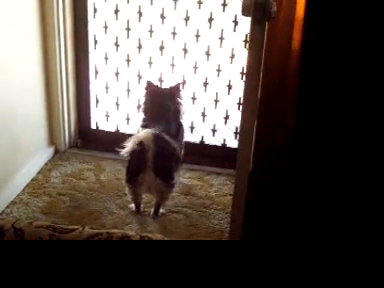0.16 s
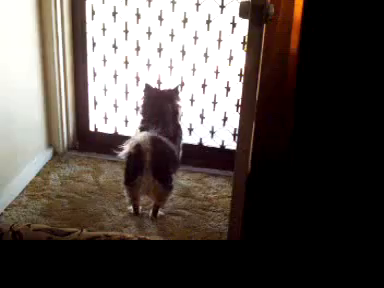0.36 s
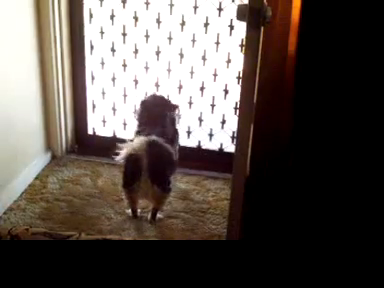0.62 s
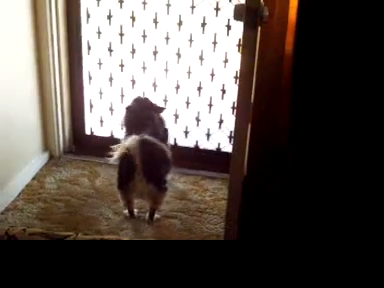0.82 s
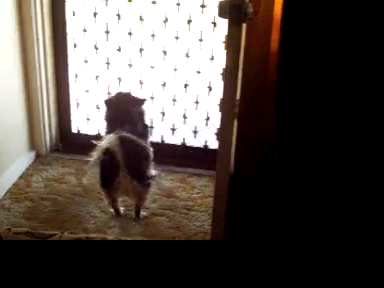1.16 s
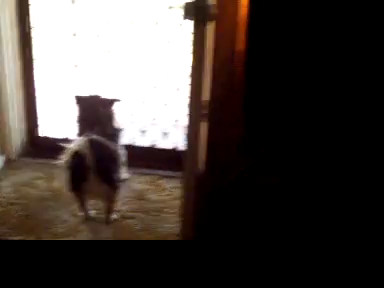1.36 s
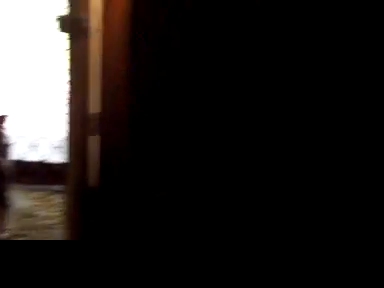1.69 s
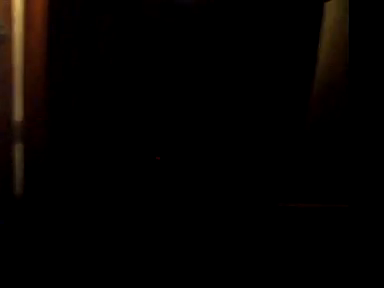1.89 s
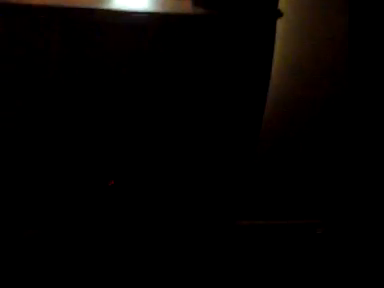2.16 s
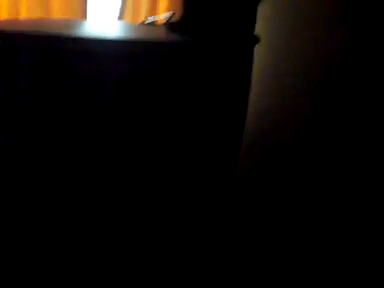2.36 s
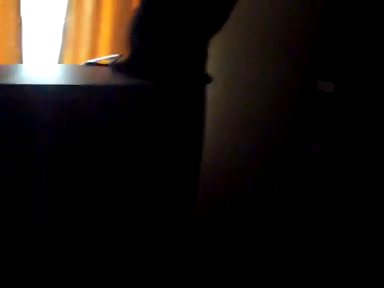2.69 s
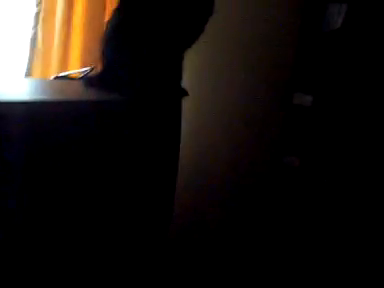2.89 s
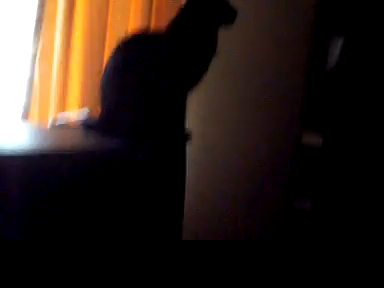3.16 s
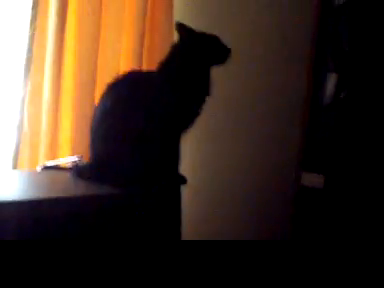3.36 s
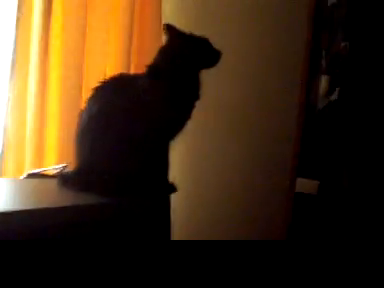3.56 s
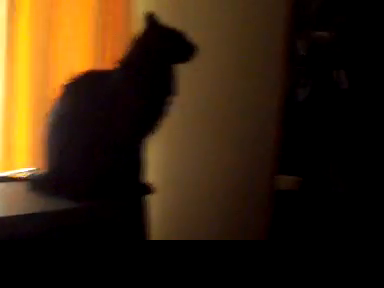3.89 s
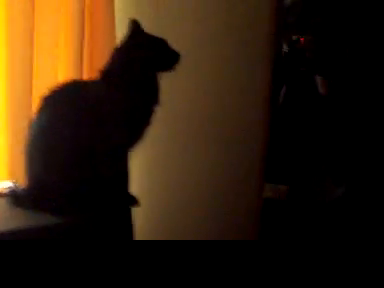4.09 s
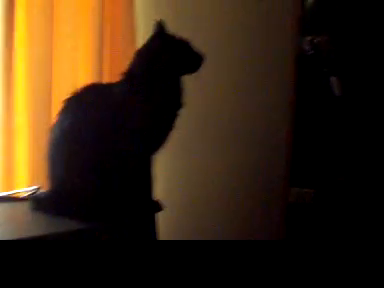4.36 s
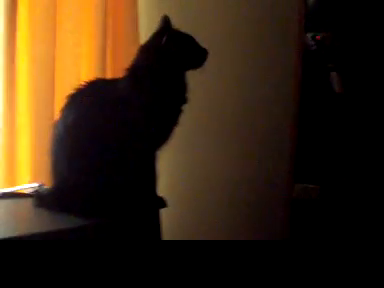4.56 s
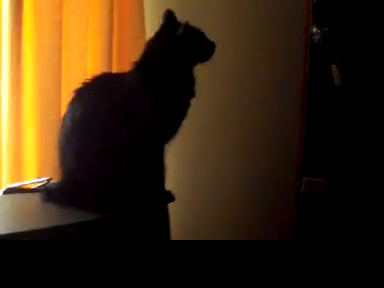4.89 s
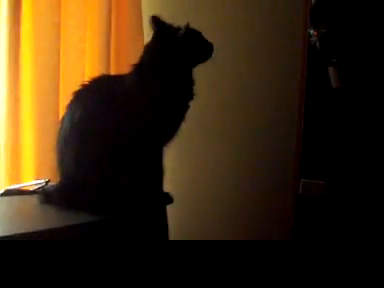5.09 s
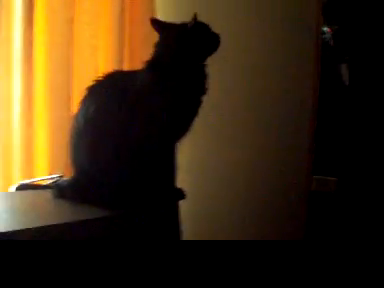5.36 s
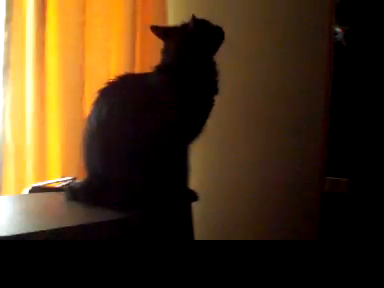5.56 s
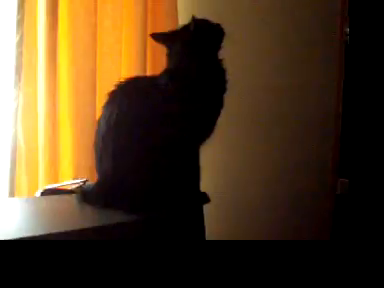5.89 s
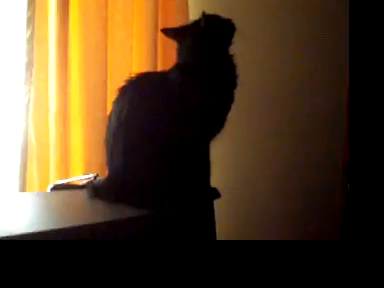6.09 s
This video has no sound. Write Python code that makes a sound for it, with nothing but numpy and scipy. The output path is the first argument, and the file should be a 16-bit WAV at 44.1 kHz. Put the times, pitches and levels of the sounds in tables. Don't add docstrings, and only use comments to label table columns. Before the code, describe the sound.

Hoarse little-dog barks come in an uneven run of seven, then one alone, then two more clusters, ringing in a home hallway.

```python
import sys
import numpy as np
from scipy import signal
from scipy.fft import rfft, irfft
from scipy.io import wavfile
from scipy.ndimage import uniform_filter1d

SR = 44100
rng = np.random.default_rng(int(sys.argv[2]) if len(sys.argv) > 2 else 0)


def decibels_to_gain(level_db):
    exponent = np.asarray(level_db, float) / 20
    return 10 ** exponent


def digitize_waveform(pressure):
    field = np.atleast_2d(pressure).T
    bounded = np.clip(field, -1, 1)
    quanta = np.round(bounded * 32767).astype(np.int16)
    wavfile.write(sys.argv[1], SR, quanta)


N = 274743
LEAD_IN_S = .04


def at_hz(points, hz):
    points_hz, values = np.array(points).T
    return np.interp(np.log(hz + 1), np.log(points_hz), values)


def rms_one(x):
    return x / np.sqrt(np.mean(np.abs(x) ** 2) + 1e-20)


def wander(rate_hz, size):
    r = np.exp(-2 * np.pi * rate_hz / SR)
    noise = rng.standard_normal(size + 4000)
    return rms_one(signal.lfilter([1], [1, -2 * r, r * r], noise)[4000:])


def dog():
    # start in seconds, opening level in dB, swell in seconds,
    # hold in seconds, peak level in dB.
    bark_events = [(0.411, -22, .064, 0.015, -3.5), (0.614, -26, 0.047, 0.028, -10),
                   (0.821, -28, 0.05, 0.017, -16), (1.054, -31, 0.025, 0.021, -21.5),
                   (1.26, -38.5, 0.046, 0.038, -19.5), (1.489, -30.5, 0.036, 0.042, -12),
                   (1.706, -29, .022, 0.075, -16.5), (2.665, -17, 0.038, 0.047, -9),
                   (3.834, -30.5, .046, .048, -6.5), (4.046, -33, 0.027, 0.071, -18),
                   (4.29, -35.5, .05, .025, -27), (4.817, -40.5, 0.058, 0.053, -12.5),
                   (5.122, -48, 0.048, 0.072, -22.5), (5.365, -24.5, 0.0483, 0.019, -12.5),
                   (5.621, -36.5, 0.043, 0.071, -17.5)]
    # top pitch in Hz, share of it at the opening, share at the end,
    # brightness in dB, drop after the hold in dB.
    bark_arches = [(412.5, 0.65, .8, 1.5, 18.5), (407.5, 1, 0.43, 1.5, 12), (354, .78, .66, 2.5, 9.5),
                   (294, 0.58, 0.6, -1.5, 10), (281, 0.64, 1, -4.5, 13), (250.6, 1, 0.89, 1, 11.5),
                   (337.4, .76, 0.78, -0.5, 13.5), (415.8, 0.69, 1, 1.5, 15), (415.3, 0.77, 0.92, 5, 13),
                   (353, 0.75, .8, 6, 11), (267, 0.81, 0.27, -2.5, 11), (391.8, .82, 0.95, 0.5, 11.5),
                   (269, .86, 0.82, -5, 11.5), (399.5, 0.83, 0.98, 3, 4), (379.2, .76, 0.5, 2.5, 13)]
    roughness = [.45, .65, .2, .1, .5, .8, .5, .75, .33, .2, .25, .28, .1, .5, .72]
    openings = [0.87, 0.89, 0.89, 0.89, 0.89, 0.91, 0.93, 0.91, 0.9, 0.95, 0.86, 0.89, 0.87, 0.93, 0.98]
    tongues_hz = [2260, 2100, 1870, 1770, 1800, 2070, 2170, 2390, 2260, 2056, 1620, 2162, 1960, 2322, 2170]
    out = growl()
    for event, arch, *manner in zip(bark_events, bark_arches, roughness, openings, tongues_hz):
        call = bark(effort(*event, *arch), *manner)
        at = round((event[0] - LEAD_IN_S) * SR)
        out[at:at + len(call)] += call
    return out


def effort(s, opening_db, swell, hold, peak_db, pitch_hz, opening, closing, bright_db, drop_db):
    drop_s, trail_s, trail_db = .03, .065, 14.5
    times = s + np.cumsum([0, swell / 2, swell / 2, hold / 2, hold / 2, drop_s, trail_s])
    halfway_db = opening_db + 0.44 * (peak_db - opening_db)
    from_peak_db = peak_db - np.cumsum([0, 0, 0, drop_db, trail_db])
    level_db = np.array([opening_db, halfway_db, *from_peak_db])

    swell_pitch, held_pitch = 0.95, 1
    risen = opening + .72 * (swell_pitch - opening)
    sagged = held_pitch + 0.51 * (closing - held_pitch)
    pitch = pitch_hz * np.array([opening, risen, swell_pitch, 1, held_pitch, sagged, closing])

    chest_db = -38 - (1 - 0.18) * level_db
    chest_db = chest_db + 0.5 * (times == times[-1])
    bright_db = bright_db + 0.36 * (level_db - peak_db)
    return np.transpose([times, level_db, pitch, chest_db, bright_db])


def bark(rows, hoarse, mouth, tongue_hz):
    times, *columns = np.transpose(rows)
    start, end = times[0], times[-1]
    size = 10240
    t = start - LEAD_IN_S + np.arange(size) / SR
    level_db, pitch, chest_db, bright_db = (np.interp(t, times, column) for column in columns)
    shut = np.clip((t - start) / (end - start) * 2.5 - 1.5, 0, 1)

    pitch = pitch * (1 + 5 * np.minimum(t - start, 0))
    pitch = pitch * (1 - .07 * shut)
    noise_share = hoarse * np.clip((420 - pitch) / 70, .8 * hoarse, 1.2)
    pitch = pitch * (1 + (.004 + .02 * hoarse) * wander(60, size))
    cycle = 2 * np.pi * np.cumsum(pitch) / SR

    folds = 0
    for k in range(1, 17):
        smear = (wander(150, size) + 1j * wander(150, size)) / np.sqrt(2)
        noisy = noise_share ** min(k / 2.5, 1, (4.5 / k) ** 2)
        strength = np.sqrt(1 - noisy) + np.sqrt(noisy) * smear
        folds = folds + np.real(strength * np.exp(1j * k * (cycle + .7 * k)))

    opened_bands = throat(folds, mouth, tongue_hz)
    shut_bands = throat(folds, mouth * 0.67, tongue_hz)
    chest, main, high = (a * (1 - shut) + b * shut for a, b in zip(opened_bands, shut_bands))
    even = uniform_filter1d(main ** 2, size=600) ** -.5
    opened = np.clip((t - start) / .004 + .5, 0, 1)
    hum = np.clip(1 + (t - start) / .024, 0, 1) * decibels_to_gain(-1.5 * (2 - opened))
    voice = decibels_to_gain(chest_db) * rms_one(chest) * hum ** 2
    voice = voice + (main + decibels_to_gain(bright_db) * high) * even * opened
    gusts_db = 2.0 * wander(30, size)
    return voice * decibels_to_gain(level_db + gusts_db) * np.clip((end - t) / .03, 0, 1)


def throat(x, mouth, tongue_hz):
    # frequency in Hz, level in dB.
    throat_curve = [(120, -14), (260, -0.4), (430, -8.5), (560, -19.5), (800, -0.4), (1100, 1.5),
                    (1230, -6.5), (1420, -26), (1900, -37), (2700, -43), (3500, -48.5), (4300, -37)]
    hz = np.fft.rfftfreq(len(x), 1 / SR)
    spectrum = rfft(x) * decibels_to_gain(at_hz(throat_curve, hz / mouth))
    tongue = 1 + decibels_to_gain(18) / (1 + (2 * (hz - tongue_hz) / 150) ** 2)
    chest = np.clip((480 - hz) / 60, 0, 1)
    high = np.clip((hz - 1300) / 200, 0, 1)
    return [irfft(spectrum * part, len(x)) for part in (chest, 1 - chest - high, high * tongue)]


def growl():
    # start in seconds, end in seconds, first level in dB, last level in dB.
    growl_spans = [
        (0.0, 0.386, -59, -77),
        (4.467, 4.831, -51, -56.5),
    ]
    breath_leaks = [
        1.5,
        .12,
    ]
    t = np.arange(N) / SR
    flaps_per_s = 25 * (1 + .12 * wander(8, N))
    cycle = np.cumsum(flaps_per_s) / SR % 1
    noise = rng.standard_normal(N)
    puffs = 0
    for (start, end, *ends_db), leak in zip(growl_spans, breath_leaks):
        swell = decibels_to_gain(np.interp(t, [start, end], ends_db)) * (t >= start) * (t < end)
        puffs = puffs + noise * swell * rms_one(np.exp(-cycle / 0.13) + leak)
    chest, main, high = throat(puffs, mouth=0.63, tongue_hz=1830)
    return decibels_to_gain(12.5) * (chest * decibels_to_gain(3.5) + main + high)


def hallway(x):
    # frequency in Hz, time to fall by 60 dB in seconds.
    hall_decay = [(150, .3), (420, .38), (700, .33), (1000, .33), (1500, .2), (2500, .26), (4000, .18)]
    t = np.arange(SR) / SR
    early = 0
    for low in 125 * 2 ** np.arange(0, 5.1, .5):
        band_pass = signal.butter(2, [low, low * np.sqrt(2)], "band", fs=SR, output="sos")
        band = signal.sosfilt(band_pass, rng.standard_normal(SR))
        early = early + rms_one(band) * np.sqrt(low) * decibels_to_gain(-60 * t / at_hz(hall_decay, low))
    early = early * np.clip((t - .003) / .006, 0, 1)
    early = early / np.linalg.norm(early) / np.sqrt(4)

    rooms = rng.standard_normal(SR) * decibels_to_gain(-60 * t / 1.1) * (1 - np.exp(-t / .05))
    far_wall = rng.standard_normal(SR) * np.exp(-((t - .46) / .03) ** 2)
    tail = decibels_to_gain(-24) * rooms / np.linalg.norm(rooms) + decibels_to_gain(-38) * far_wall / np.linalg.norm(far_wall)
    tail = np.diff(tail, prepend=0)
    return signal.fftconvolve(x, decibels_to_gain(-15.5) * early + tail)[:N]


def house():
    # frequency in Hz, density in dB per Hz.
    room_tone = [(12, -19), (20, -11), (55, -14.5), (92, -24.5), (150, -23), (290, -35), (550, -40),
                 (800, -36), (1270, -41.5), (1600, -48.5), (2500, -46), (3900, -50.5), (4600, -80.5),
                 (8000, -120)]
    # frequency in Hz, level in dB.
    motor_whine = (1717, -84)
    # time in seconds, peak level in dB.
    claw_ticks = [
        (3.45, -49),
    ]
    t, hz = np.arange(N) / SR, np.fft.rfftfreq(N, 1 / SR)
    air = rfft(rng.standard_normal(N)) * decibels_to_gain(at_hz(room_tone, hz))
    bass = 1 / (1 + (hz / 200) ** 4)
    rumble = irfft(air * bass, N) * decibels_to_gain(2.5 * wander(12, N))
    rustle = irfft(air * (1 - bass), N) * decibels_to_gain(0.61 * wander(16.0, N))
    tone = decibels_to_gain(-58.5) * rms_one(rumble + rustle)

    whine_hz, whine_db = motor_whine
    whine = decibels_to_gain(whine_db + 3 + 2.5 * wander(12, N)) * np.sin(2 * np.pi * whine_hz * t)

    ticks = np.zeros(N)
    for s, db in claw_ticks:
        at = round(s * SR)
        ticks[at:at + 900] += decibels_to_gain(db) * rng.standard_normal(900) * np.exp(-np.arange(900) / 200)
    return tone + whine + signal.lfilter([.3], [1, -.8], ticks)


def electronics():
    # frequency in Hz, level in dB, throbs per second, phase in radians, stop in seconds.
    throbbing_whine = (1465, -81, 15.02, 1.49, 3.4)
    # time into the loop in seconds, relative size.
    clock_bumps = [
        (0.039, 0.32),
        (0.107, 0.47),
        (0.142, 0.44),
        (0.171, .99),
        (0.196, 0.49),
    ]
    t = np.arange(N) / SR
    line_hz, line_db, throbs, phase, stop = throbbing_whine
    throb = np.clip(.4 + np.cos(2 * np.pi * throbs * t + phase), 0, 1) * (t < stop)
    whine = decibels_to_gain(line_db + 4) * throb * np.sin(2 * np.pi * line_hz * t)

    loop_s = 3 / throbs
    bumps = 0
    for s, size in clock_bumps:
        for lap in (0, 1):
            u = (t % loop_s - s + lap * loop_s) / 0.0043
            bumps = bumps + size * u * np.exp(-u ** 2 / 2)
    return whine + decibels_to_gain(-39.5 + 2 * wander(3.5, N)) * bumps


def scene():
    voice = dog()
    return (decibels_to_gain(-1.0) * voice + hallway(voice) + house() + electronics())[None]


def top_cut(x):
    return signal.sosfilt(signal.butter(12, 15600, fs=SR, output="sos"), x)


def record(dry):
    limit = np.where(dry > 0, .45, .69)
    x = dry / (1 + np.abs(dry / limit) ** 12) ** (1 / 12)
    x = signal.sosfilt(signal.butter(1, 14, "high", fs=SR, output="sos"), x)
    x = signal.sosfilt(signal.cheby2(10, 60, 4650, fs=SR, output="sos"), x)
    rail, hiss_db = .71, -102
    x = np.clip(x, -rail, rail) + decibels_to_gain(hiss_db) * rng.standard_normal(x.shape)
    return top_cut(x)


dry = scene()
out = record(dry)
digitize_waveform(out)
```